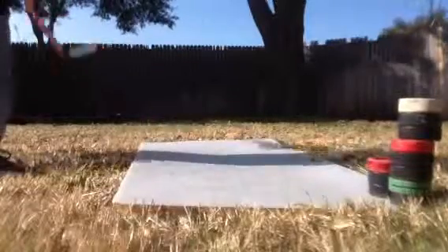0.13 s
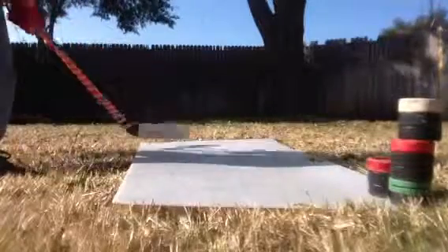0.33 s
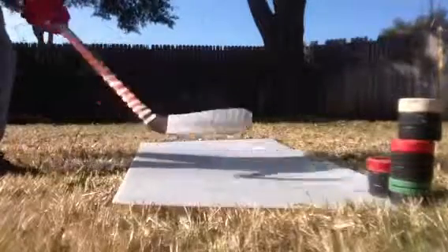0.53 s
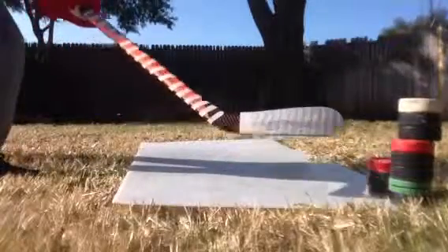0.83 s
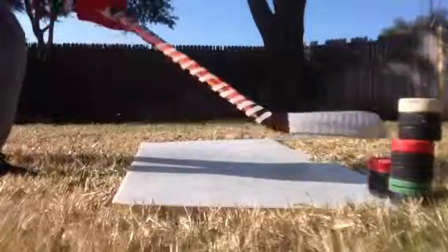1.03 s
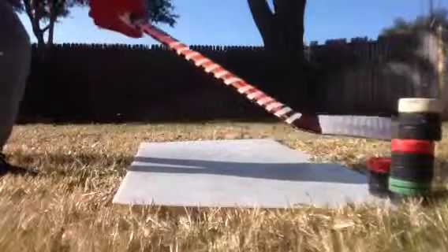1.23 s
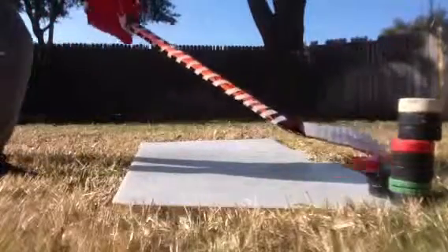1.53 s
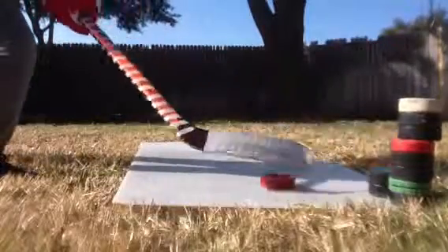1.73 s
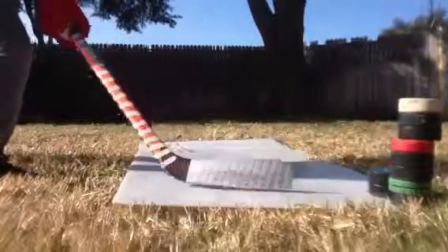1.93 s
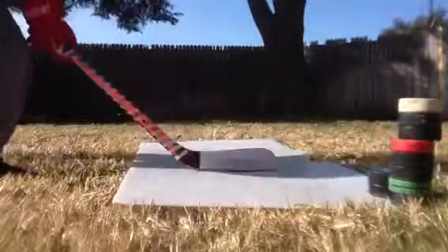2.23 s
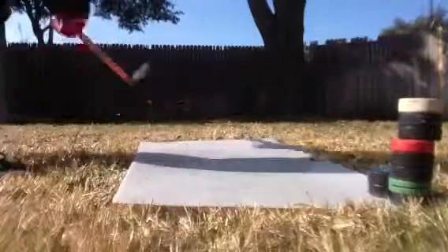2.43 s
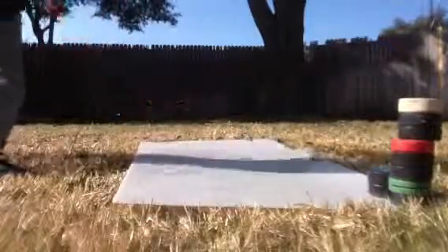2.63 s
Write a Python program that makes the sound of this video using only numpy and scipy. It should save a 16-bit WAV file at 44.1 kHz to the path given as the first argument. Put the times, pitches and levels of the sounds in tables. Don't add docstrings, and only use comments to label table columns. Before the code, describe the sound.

Backyard hockey practice: one loud fence crack rings across the yard, soft thuds and dry grass follow, then a stick pulls a puck down with hard clacks, drags it and flicks it away; mono, faint traffic.

```python
import sys
import numpy as np
from scipy import signal
from scipy.fft import rfft, irfft
from scipy.io import wavfile

SR = 44100
rng = np.random.default_rng(int(sys.argv[2]) if len(sys.argv) > 2 else 0)


def unload_audio(sound):
    columns = np.transpose(np.atleast_2d(sound))
    steps = np.round(np.clip(columns, -1, 1) * 32767)
    wavfile.write(sys.argv[1], SR, steps.astype(np.int16))


def voltage_ratio(level):
    return 10 ** (np.asarray(level, float) / 20)


N = 123479

# pitch in Hz, level in dB, T60 in seconds.
FENCE_MODES = [(203, -24, 0.11), (427, -14.5, 0.015), (270, -35, 0.027), (586, -19, 0.029),
               (1020, -36, 0.031), (1570, -28, 0.0073), (2560, -34, 0.036), (2745, -23.5, 0.019),
               (3480, -22.5, 0.0088), (4010, -25, 0.0065), (4850, -33, 0.012), (7200, -37, 0.0043)]
# start in seconds, level in dB, tilt in dB per octave.
BANG_RETURNS = [
    (0.2423, 6, 1.3),
    (0.2453, -22.5, 10.1),
    (0.2542, -0.5, -6),
    (0.259, -6, 0),
    (0.2738, -3, -1.5),
    (0.2782, -4.5, 0),
    (0.285, -8, -2.5),
    (0.305, -19, 0),
]
# frequency in Hz, level in dB per Hz.
YARD_COLOUR = [(53, -24), (90, -20), (216, 10.5), (870, -9.5), (948, -10), (2140, -11.5), (4930, -12.5),
               (11400, -21), (15000, -26)]
# frequency in Hz, T60 in seconds.
YARD_T60 = [(100, 0.77), (200, 0.59), (500, 0.47), (1500, 0.69), (4000, 0.58), (8000, 0.3), (14000, 0.39)]
# pitch in Hz, level in dB, T60 in seconds.
BOARD_MODES = [(215, -18, 0.01), (387, -5.5, 0.018), (574, -4.5, 0.028), (960, -21, .014),
               (1476, -5, 0.0087), (1960, -27, 0.0066)]
# pitch in Hz, level in dB, T60 in seconds.
CLACK_MODES = [(3510, -10, 0.0037), (4230, -11, 0.0038), (6460, -9.5, 0.0048), (8400, -36, 0.0028),
               (9900, -8, 0.0018), (12900, -30, 0.0021)]
# start in seconds, body level in dB, clack level in dB,
# body tilt in dB per octave, pitch in Hz where the board is struck.
TAP_HITS = [(1.659, -10.5, -14.5, -1, 431), (1.6665, -20, -33, -9, 570), (1.6809, -28, -29, -4, 600),
            (1.6847, -7.5, -11, -4.3, 574), (1.6904, -24.5, -19, 9.5, 640), (1.704, -36, -39, 8, 644),
            (1.7111, -29, -50, -1, 607), (1.7152, -23, -42, -8, 474), (1.722, -34, -55, -9, 635),
            (1.729, -36, -25, -16, 574), (1.7317, -24.5, -46, -4, 564), (1.742, -25.5, -60, -5, 425),
            (1.754, -34, -55, -3, 546), (1.799, -32, -60, -13, 424), (1.943, -24.5, -12, -2.2, 533),
            (1.9465, -21, -43, 0.5, 390), (1.957, -27.5, -38, -0.5, 497), (1.965, -42, -34, 5, 574),
            (1.987, -46, -37.5, -5, 510), (2.045, -44, -32.5, -19, 490), (2.061, -14.5, -52, 2, 519),
            (2.082, -40, -56, 10, 574), (2.089, -34.5, -40, 6.5, 574), (2.206, -29, -30.5, 1.5, 623),
            (2.2248, -35, -34, 8, 617), (2.234, -43, -55, 12, 504), (2.249, -35.5, -65, 0, 397),
            (2.2632, -25.5, -37, -2, 490), (2.285, -47, -45, 12, 530), (2.302, -25.5, -32, -7, 477),
            (2.31, -36, -60, -1, 487), (2.327, -39, -60, 4, 446), (2.336, -36, -60, -6, 440),
            (2.345, -28.5, -50, -6, 570), (2.37, -39, -55, -4, 450), (2.386, -26, -28, -5, 477),
            (2.391, -31, -60, -1, 480), (2.4672, -19.5, -63, -15.5, 462), (2.505, -32.5, -70, -6, 623)]
# start in seconds, level in dB, pitch in Hz.
FLICK_TICKS = [
    (2.0618, -36, 4300),
    (2.398, -32, 1500),
    (2.4034, -23, 1460),
    (2.408, -21.5, 1890),
    (2.4111, -24.5, 1850),
    (2.4191, -26, 2350),
    (2.4209, -19.5, 3900),
    (2.411, -26, 3180),
    (2.4259, -22.5, 4160),
    (2.428, -32, 1970),
]
# start in seconds, level in dB, pitch in Hz, T60 in seconds.
LAWN_THUDS = [(0.243, -41, 65, 0.037), (1.122, -41, 92, 0.11), (1.898, -28, 302, 0.032),
              (2.525, -18, 193, 0.041), (0.531, -9.5, 191, 0.017), (1.171, -39.5, 106, 0.14),
              (1.232, -16, 194, 0.036), (1.30, -39, 148, 0.084), (1.448, -33.5, 233, 0.072),
              (1.493, -29, 151, 0.094), (1.569, -27, 200, 0.034), (1.601, -27, 143, 0.099),
              (1.629, -16, 188, 0.04), (1.886, -21, 153, 0.057), (1.911, -20.5, 203, 0.077),
              (2.169, -20.5, 176, 0.026), (2.247, -46, 145, 0.016), (2.469, -15.5, 199, 0.03),
              (2.493, -18, 270, 0.058), (2.505, -17, 164, 0.061), (2.513, -28.5, 293.5, 0.17),
              (2.591, -22, 163, 0.02)]
# time in seconds, hiss level in dB, rumble level in dB.
GLIDE_STROKES = [
    [(1.69, -51, -34), (1.74, -60.5, -42), (1.8, -65, -49), (1.86, -72, -45), (1.9, -83, -61),
     (1.96, -72, -47), (2.02, -77, -52), (2.06, -70, -67)],
    [(2.07, -61, -24), (2.095, -60, -43.5), (2.2, -57, -47), (2.3, -52, -39.5), (2.35, -45.5, -43.5),
     (2.388, -40.5, -42), (2.394, -53.5, -30), (2.43, -55, -42), (2.48, -70, -52)],
]
# frequency in Hz, level in dB.
HISS_COLOUR = [(880, -20), (1500, -20), (2350, -7), (4140, 9), (5140, -2.5), (6690, 6), (8620, 5.5),
               (12000, 12.5), (15500, -42)]
# frequency in Hz, level in dB.
RUMBLE_COLOUR = [(53, -42), (90, -21), (243, 1.5), (467, 2.5), (748, -10), (1220, -8), (1890, -17),
                 (5000, -21.5), (6500, -73), (11000, -120)]
# frequency in Hz, width in Hz, level in dB.
HISS_RESONANCES = [(6540, 150, -8.5), (8220, 150, -12), (10560, 320, -10), (12260, 1300, 0.5)]
# centre in seconds, length in seconds, level in dB.
GRASS_SWISHES = [
    (0.509, 0.038, -57.5),
    (.735, 0.037, -59.5),
    (0.845, 0.015, -60.5),
    (0.885, 0.1, -62),
    (1.235, .05, -63.5),
    (1.362, 0.039, -63),
    (2.01, 0.043, -61.5),
    (2.77, .06, -63),
]
# frequency in Hz, level in dB.
GRASS_COLOUR = [(1500, -17), (4000, -14), (8000, -10.5), (13000, -9), (15500, -16)]
# frequency in Hz, level in dB per Hz.
AIR_COLOUR = [(15, -81), (25, -45), (140, -3), (313, -4), (359, -7.5), (399, -8.5), (1020, -17.5),
              (1300, -22.5), (15500, -29.5)]
# frequency in Hz, level in dB per Hz.
TRAFFIC_COLOUR = [(24, -64.5), (40, -27), (149, 3), (234, -0.5), (278, -11.5), (1460, -16.5), (2500, -34),
                  (3250, -29), (5500, -120)]
# time in seconds, traffic level in dB, air level in dB.
BACKGROUND_SWELL = [(0, -50.5, 8.5), (0.102, -49.5, 6), (.22, -51, 6.5), (.7, -56, 1.3), (1.05, -58.5, 4.5),
                    (1.2, -55.5, 3.5), (1.45, -56, 4.5), (1.9, -53, 6.5), (2.5, -49.5, 9.5),
                    (2.8, -64.5, 8)]
# start in seconds, end in seconds, pitch in Hz, level in dB.
FAR_TONES = [
    (-.1, .09, 237.5, -41),
    (0.835, 1.6, 998, -64.5),
    (2.423, 2.9, 1186, -61.5),
]

YARD_DB, YARD_EARLY_DB, YARD_EARLY_T60 = -24.5, -22, 0.043
PANEL_IN_TAIL_DB, YARD_LUMPY_DB = -23.5, 1.4
TAP_WAKE_DB, TAP_WAKE_T60 = -13, 0.041
CONTACT_HZ, SOFTER = 2500, 0.55
BOARD_LOW_HZ = 135
FLICK_CYCLES, FLICK_TOP_HZ = 18.4, 4830
THUD_RISE_S = 0.0034
AIR_DB = -59.5
MIC_TOP_HZ = 15300


def at_hz(points, hz):
    table_hz, value = np.transpose(points)
    return np.interp(np.log(hz), np.log(table_hz), value)


def noise():
    return rng.standard_normal(N)


def drift(rate):
    r = np.exp(-80 * np.pi * rate / SR)
    slow = signal.lfilter([1], [1, -2 * r, r * r], rng.standard_normal(N // 40 + 2002))[2000:]
    return np.interp(np.arange(N) / 40, np.arange(len(slow)), slow / slow.std())


def colour(x, spectrum):
    hz = np.fft.rfftfreq(N, 1 / SR) + 1
    low, high = spectrum[0][0], spectrum[-1][0]
    gain = voltage_ratio(at_hz(spectrum, hz)) / (1 + (low / hz) ** 4) / (1 + (hz / high) ** 4)
    y = irfft(rfft(x) * gain, N)
    return y / y.std()


def clicks(s, gains):
    out = np.full(N, 1e-18)
    np.add.at(out, (np.asarray(s) * SR).astype(int), gains)
    return out


def ring(x, hz, t60):
    r, w = voltage_ratio(-60 / (t60 * SR)), 2 * np.pi * hz / SR
    return signal.lfilter([0, np.sin(w)], [1, -2 * r * np.cos(w), r * r], x)


def dying(s, gains, t60):
    return signal.lfilter([1], [1, -voltage_ratio(-60 / (t60 * SR))], clicks(s, gains))


def fence_bang():
    s, db, tilt_db = np.transpose(BANG_RETURNS)
    out = np.zeros(N)
    for k, (hz, mode_db, t60) in enumerate(FENCE_MODES):
        hit_db = db + mode_db + tilt_db * np.log2(hz / 500) + rng.normal(0, 1.0, len(s))
        out += (-1) ** (k + 1) * ring(clicks(s, voltage_ratio(hit_db)), hz, t60)
    return out


def yard_tail():
    s = np.transpose(BANG_RETURNS)[0]
    tail = colour(noise(), YARD_COLOUR)
    for hz, _, t60 in FENCE_MODES[6:-1]:
        panel = ring(tail, hz, 2 * t60)
        tail = tail + voltage_ratio(PANEL_IN_TAIL_DB) * panel / panel.std()
    early = dying(s[1:2], voltage_ratio(YARD_EARLY_DB), YARD_EARLY_T60)
    edges = 80 * 2 ** np.arange(0, 7.7, 0.5)
    out = np.zeros(N)
    for k, (low, high) in enumerate(zip(edges, edges[1:])):
        band = signal.sosfilt(signal.butter(2, [low, high], "band", fs=SR, output="sos"), tail)
        late = dying(s[:1], voltage_ratio(YARD_DB), at_hz(YARD_T60, np.sqrt(low * high)))
        out += (-1) ** k * band * voltage_ratio(YARD_LUMPY_DB * drift(70)) * (late + early)
    return out


def taps():
    n = SR // 8
    out = np.zeros(N)
    hit = np.eye(1, n)[0] + 1e-18
    for s, body_db, clack_db, tilt_db, pitch_hz in TAP_HITS:
        luck = rng.normal(0, 1.5, 12)
        body, clack = np.zeros(n), np.zeros(n)
        for k, (hz, db, t60) in enumerate(BOARD_MODES):
            bend = pitch_hz / BOARD_MODES[2][0] if k < 3 else 1
            level = voltage_ratio(db + luck[k] + tilt_db * np.log2(hz / 570))
            body += (-1) ** (1 + k // 3) * level * ring(hit, hz * bend, t60)
        for k, (hz, db, t60) in enumerate(CLACK_MODES):
            clack += voltage_ratio(db + luck[k + 6]) * ring(hit, hz, t60)
        contact_hz = np.clip(CONTACT_HZ * voltage_ratio(SOFTER * tilt_db), 600, 9000)
        body = signal.lfilter(*signal.butter(4, contact_hz, fs=SR), body)
        start = int(s * SR)
        out[start:start + n] += voltage_ratio(body_db) * body + voltage_ratio(clack_db) * clack
    return out


def tap_wake():
    s, body_db, clack_db, *_ = np.transpose(TAP_HITS)
    dull = signal.lfilter(*signal.butter(4, CONTACT_HZ, fs=SR), colour(noise(), YARD_COLOUR))
    bright = colour(noise(), GRASS_COLOUR)
    out = dying(s, voltage_ratio(body_db + TAP_WAKE_DB), TAP_WAKE_T60) * dull
    return out + dying(s, voltage_ratio(clack_db - 18), 0.019) * bright


def flick():
    ticks = np.zeros(N)
    for s, db, hz in FLICK_TICKS:
        t60 = FLICK_CYCLES / hz
        upper = ring(clicks([s], 0.54), hz, t60)
        lower = ring(clicks([s], 0.84), hz * 0.7, t60)
        ticks += voltage_ratio(db) * (upper + 0.82 * lower)
    return signal.lfilter(*signal.butter(2, FLICK_TOP_HZ, fs=SR), ticks)


def glide():
    t = np.arange(N) / SR
    grit = noise() * voltage_ratio(2.87 * rng.exponential(1, N))
    hiss = colour(grit, HISS_COLOUR)
    for hz, width_hz, db in HISS_RESONANCES:
        sing = ring(grit, hz, 4.6 / width_hz)
        hiss += voltage_ratio(db) * sing / sing.std()
    bumps = noise() * voltage_ratio(2.7 * np.minimum(rng.exponential(1, N), 6.5))
    rumble = colour(bumps, RUMBLE_COLOUR) * voltage_ratio(3.0 * drift(37))
    out = np.zeros(N)
    for stroke in GLIDE_STROKES:
        s, hiss_db, rumble_db = np.transpose(stroke)
        gate = np.clip(np.minimum(t - s[0], s[-1] - t) / 0.019, 0, 1)
        hiss_gain = voltage_ratio(np.interp(t, s, hiss_db) + drift(56))
        rumble_gain = voltage_ratio(np.interp(t, s, rumble_db) - 3.0)
        out += gate * (hiss_gain * hiss + rumble_gain * rumble)
    return out


def thuds():
    t = np.arange(N) / SR
    out = np.zeros(N)
    for s, db, hz, t60 in LAWN_THUDS:
        age = np.clip(t - s, 0, 1)
        envelope = voltage_ratio(db - 60 * age / t60 - 2.0) * (1 - np.exp(-age / THUD_RISE_S))
        out += envelope * (np.sin(2 * np.pi * hz * age) + 0.23 * np.sin(3.7 * np.pi * hz * age))
    return out


def grass():
    t = np.arange(N) / SR
    shape = sum(voltage_ratio(db) * np.exp(-((t - s) / length) ** 2) for s, length, db in GRASS_SWISHES)
    crackle = noise() * voltage_ratio(3.5 * np.minimum(rng.exponential(1, N), 5.5))
    return shape * colour(crackle, GRASS_COLOUR)


def background():
    t = np.arange(N) / SR
    s, traffic_db, air_db = np.transpose(BACKGROUND_SWELL)
    air_gain = voltage_ratio(AIR_DB + np.interp(t, s, air_db) + 0.15 * drift(27))
    traffic_gain = voltage_ratio(np.interp(t, s, traffic_db) + 0.94 * drift(10.3))
    out = air_gain * colour(noise(), AIR_COLOUR) + traffic_gain * colour(noise(), TRAFFIC_COLOUR)
    for start, end, hz, db in FAR_TONES:
        gate = np.clip(np.minimum(t - start, end - t) / 0.086, 0, 1)
        tone = np.sin(2 * np.pi * hz * t + 1.24 * drift(2.33))
        out += gate * voltage_ratio(db + 1.0 * drift(4.1)) * tone
    return out


def scene():
    no_bass = signal.butter(3, BOARD_LOW_HZ, "high", fs=SR, output="sos")
    board = signal.sosfilt(no_bass, taps() + tap_wake() + flick() + glide())
    return (fence_bang() + yard_tail() + board + thuds() + grass() + background())[None]


def roll_off(x):
    return signal.sosfilt(signal.butter(12, 16360, fs=SR, output="sos"), x)


def record(dry):
    thin = signal.sosfilt(signal.butter(2, 55, "high", fs=SR, output="sos"), dry)
    mix = signal.sosfilt(signal.cheby2(12, 30, MIC_TOP_HZ, fs=SR, output="sos"), thin)
    return roll_off(mix)


dry = scene()
out = record(dry)
unload_audio(out)
```